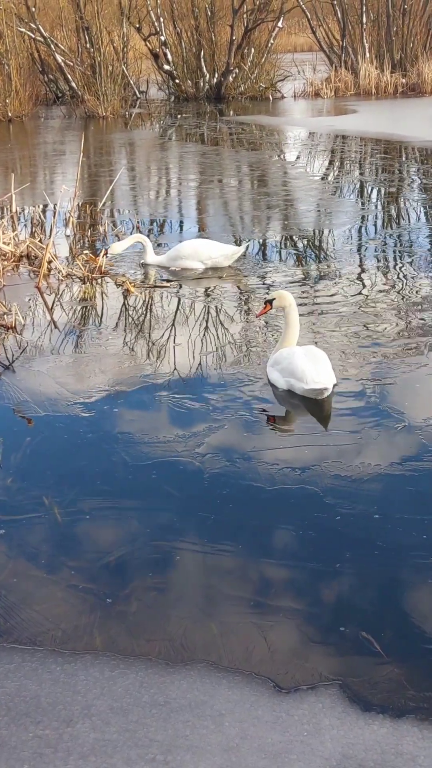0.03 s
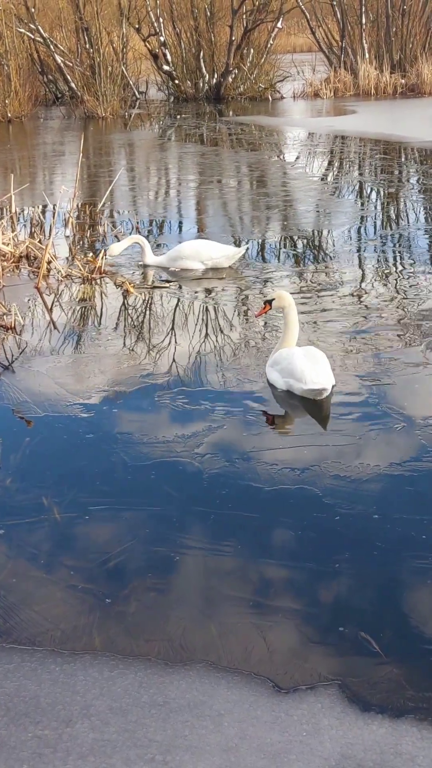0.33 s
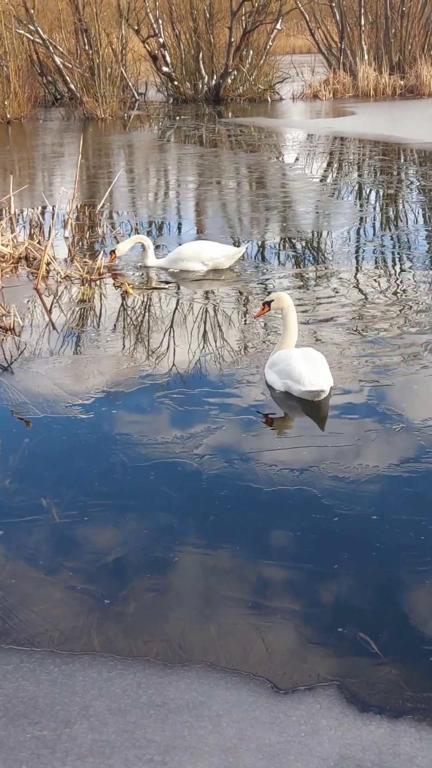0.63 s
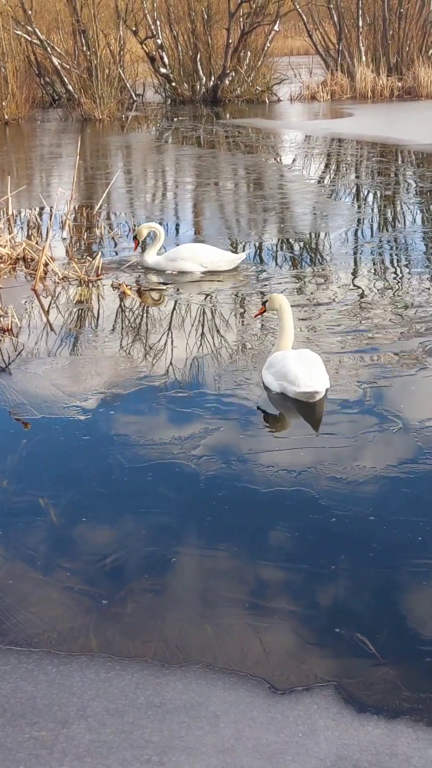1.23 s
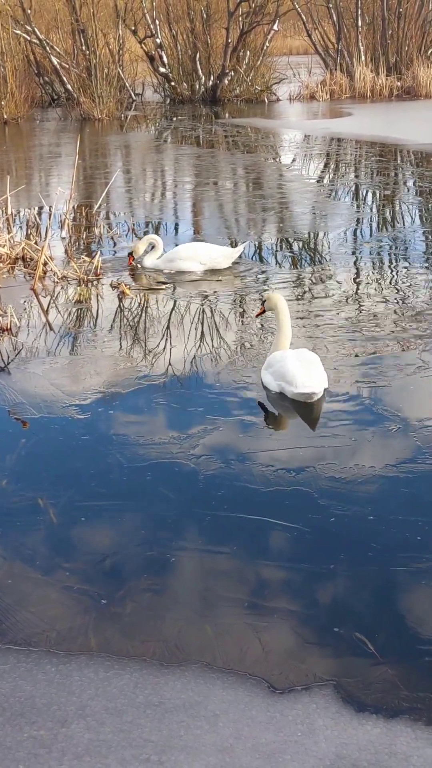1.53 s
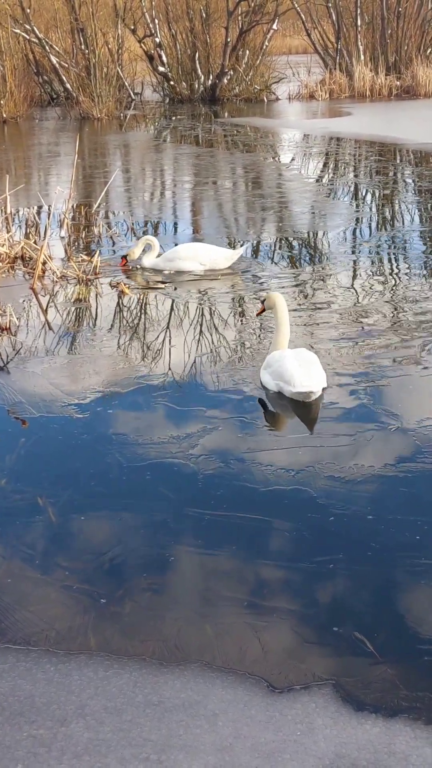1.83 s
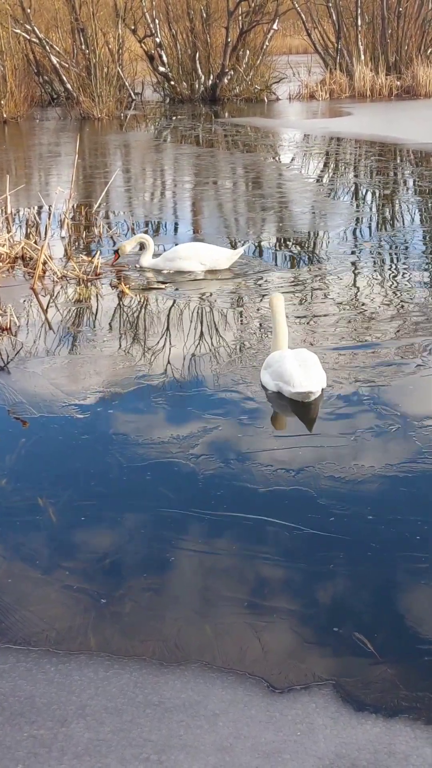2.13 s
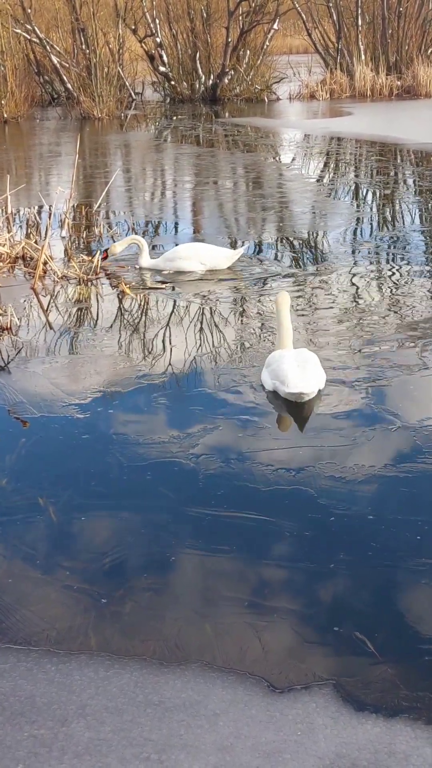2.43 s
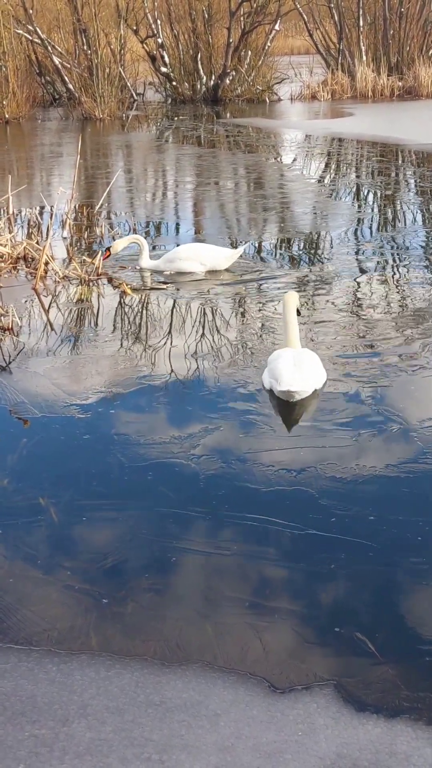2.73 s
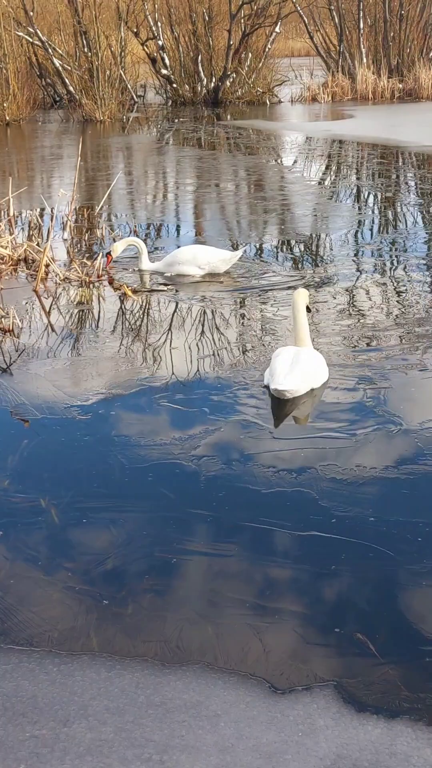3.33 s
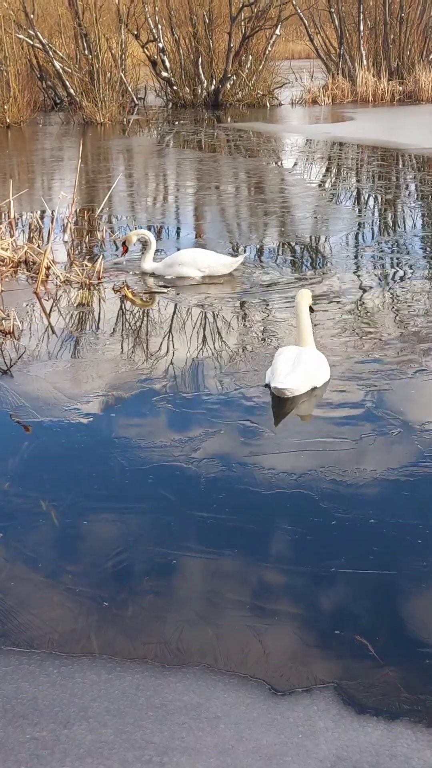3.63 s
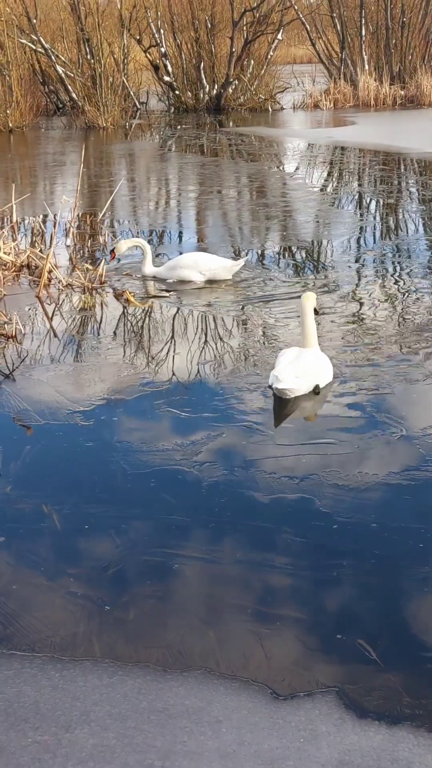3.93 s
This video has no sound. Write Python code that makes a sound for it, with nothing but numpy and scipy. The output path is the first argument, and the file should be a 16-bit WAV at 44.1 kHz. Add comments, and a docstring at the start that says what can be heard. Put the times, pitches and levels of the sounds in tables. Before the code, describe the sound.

Short, sharp waterbird calls, probably coots, echo over a pond as a swan dabbles quietly.

```python
"""A reedy pond, where two waterbirds, probably coots, trade short harsh calls.
One is bright and ringing, the other lower and more rattling; each call is a tone with overtones,
chopped by a fast flutter. A swan dabbles at the bank with sloshes, drips and ringing bubbles.
Birds and water echo off reeds and trees. Far engines rumble, and a little wind nudges the microphone."""
import sys
import numpy as np
from scipy import signal
from scipy.fft import rfft, irfft
from scipy.io import wavfile

SR = 44100
rng = np.random.default_rng(int(sys.argv[2]) if len(sys.argv) > 2 else 0)


def wav_out(sig):
    """Save sig, one row per channel (or a flat mono array), as 16-bit PCM at SR to the path in sys.argv[1]."""
    wavfile.write(sys.argv[1], SR, np.round(np.clip(np.atleast_2d(sig).T, -1, 1) * 32767).astype(np.int16))


N = 176400
TIME = np.arange(N) / SR
FREQS = np.maximum(np.arange(N + 1) * SR / (2 * N), 1)

# The bright bird's harmonics (1, 2, 3... times its pitch): level_db
BRIGHT_VOICE = [-15, -5.5, -12, -18, -24, -25.5, -31, -40, -34, -29, -36, -44]


def from_db(db):
    """Turn decibels into a number to multiply by."""
    return 10 ** (np.asarray(db) / 20)


def rms_one(x):
    """Scale a sound so its average strength (rms) is 1."""
    return x / np.sqrt(np.mean(x ** 2) + 1e-20)


def at_hz(points, hz=FREQS):
    """Read between the rows of a table, along a musical (log) frequency scale."""
    freqs, values = np.transpose(points)
    return np.interp(np.log(hz), np.log(freqs), values)


def filtered(x, response):
    """Multiply each frequency of a sound by its own gain."""
    return irfft(rfft(x, 2 * N) * response)[..., :N]


def colour(x, points):
    """Shape the tone by rows of freq_hz, gain_db; any ringing comes after a click, never before."""
    cepstrum = irfft(np.log(from_db(at_hz(points))))
    cepstrum[1:N] *= 2
    cepstrum[N + 1:] = 0
    return filtered(x, np.exp(rfft(cepstrum)))


def drift(hz):
    """A random wobble of size about 1, with little in it faster than hz."""
    return rms_one(filtered(rng.standard_normal(N), 1 / (1 + (FREQS / hz) ** 4)))


def place(x, lead_s):
    """Make a stereo sound that reaches the left side first."""
    return np.array([x, filtered(x, np.exp(-2j * np.pi * FREQS * lead_s))])


def lean(x, points):
    """Tip each frequency to the right (plus dB) or the left (minus dB)."""
    return filtered(x, from_db(at_hz(points) * np.array([[-.5], [.5]])))


def wide_noise(points, lead_s):
    """Stereo noise whose sides are alike in the bass and unrelated in the treble."""
    # How alike the sides are: freq_hz, share (0 to 1)
    likeness = [(30, 0.31), (70, 0.83), (150, 0.84), (500, 0.78), (1200, 0.83), (2500, 0.31), (5000, 0.067),
                (14000, 0.037)]
    alike = at_hz(likeness)
    shared = filtered(place(rng.standard_normal(N), lead_s), np.sqrt(alike))
    separate = filtered(rng.standard_normal((2, N)), np.sqrt(1 - alike))
    return rms_one(colour(shared + separate, points))


def engines():
    """Far traffic rumbles; a low background drone drifts slightly louder and softer."""
    # Tone of the rumble: freq_hz, gain_db
    rumble_tone = [(20, -19.5), (32, -24.5), (50, 3), (70, 1), (100, -7.5), (140, -8.5), (190, -13),
                   (270, -13.5), (380, -25.5), (550, -24), (800, -20), (1100, -24), (1500, -27),
                   (2100, -36.5), (3000, -46.5)]
    # Notes of the drone: pitch_hz, wobble_hz, level_db
    drone_notes = [(82.1, 13.6, -52.5), (112.5, 8.44, -51), (239.4, 7.3, -62.5), (509, 11.7, -78.5)]
    # The low background drone drifts slightly louder and softer: time_s, gain_db
    level_drift = [(0, -5), (.55, -1.5), (1.3, 1.5), (1.85, 2.5), (2.3, 0), (3.2, 2), (4, -7)]
    rumble = filtered(wide_noise(rumble_tone, lead_s=.00008), 1 / (1 + (FREQS / 3200) ** 6))
    rumble *= from_db(-49.5 + drift(7.7))   # flickers by about 1 dB
    drone = 0
    for hz, wobble_hz, db in drone_notes:
        pitch = hz + wobble_hz / 3 * drift(wobble_hz)
        drone += from_db(db) * np.sin(2 * np.pi * np.cumsum(pitch) / SR) * (1 + 0.35 * drift(wobble_hz))
    return rumble + drone * from_db(np.interp(TIME, *np.transpose(level_drift)))


def hiss():
    """A faint, steady hiss."""
    # Tone of the hiss: freq_hz, gain_db
    tone = [(2500, -16.5), (4000, -3.5), (7000, -8), (10000, -3), (13000, -2.5), (15500, 0)]
    return from_db(-76.5) * wide_noise(tone, lead_s=0)


def pond_echo(x):
    """Sound scatters quickly off the reeds and returns longer from the trees; treble dies first."""
    # Tone of the echo: freq_hz, gain_db
    tone = [(1000, 10.5), (1700, 15.5), (2500, 7.5), (3800, 9.5), (5200, 6), (7500, 15.5), (13000, 12)]
    reeds, trees = (-13.5, 0.164), (-17, 0.856)   # level_db, fade_s (time for the bass to drop 60 dB)
    t, tail = TIME[:SR], 0
    edges = np.geomspace(500, 17000, 9)
    for low, high in zip(edges, edges[1:]):
        hz = np.sqrt(low * high)
        band = signal.butter(2, [low, high], "band", fs=SR, output="sos")
        noise = signal.sosfilt(band, rng.standard_normal((2, SR))) * from_db(at_hz(tone, hz))
        air_loss = 1 + (hz / 13200) ** 2
        for db, fade_s in (reeds, trees):
            spread = np.sqrt(5.526 / (fade_s * SR))   # a longer echo spreads its energy thinner
            tail += noise * spread * from_db(db - 60 * air_loss * t / fade_s)
    fade_in = np.minimum(t / 0.002, 1)
    return signal.fftconvolve(x[None], tail * fade_in, axes=1)[:, :N]


def lingering_echo():
    """A bright call made just before the start still rings round the pond."""
    # That call: start_s, hold_s, pitch_hz, level_db, rattle (0 to 1), tilt_db_per_octave, rattle_hz
    call = (0, .036, 1262, -26, .15, -4, 105)
    echo = pond_echo(bird([call], BRIGHT_VOICE))
    gone = int(.17 * SR)
    return np.pad(echo[:, gone:], ((0, 0), (0, gone)))


def patter(tone, per_s=1600, spread_db=5):
    """Many tiny droplets of uneven size, each one a click."""
    sizes = from_db(spread_db * np.minimum(rng.exponential(1, N), 4)) * rng.choice([-1, 1], N)
    return rms_one(colour(sizes * (rng.random(N) < per_s / SR), tone))


def crackle(per_s=1000, spread_db=5, ring_cycles=7):
    """Tiny bubbles that each ring for a few cycles."""
    clicks = (rng.random(N) < per_s / SR) * from_db(spread_db * np.minimum(rng.exponential(1, N), 3))
    pitches_hz = np.geomspace(2200, 9000, 16)
    chosen, out = rng.integers(0, len(pitches_hz), N), 0
    for k, hz in enumerate(pitches_hz):
        decay, step = np.exp(-np.pi * hz / (ring_cycles * SR)), 2 * np.pi * hz / SR
        ringing = [1, -2 * decay * np.cos(step), decay ** 2]
        out += signal.lfilter([0, np.sin(step)], ringing, clicks * (chosen == k) + 1e-18)
    return rms_one(out)


def dabbling():
    """The feeding swan stirs the water: each slosh swells and dies away, with fine spray above it."""
    # Sloshes: peak_s, rise_s, fall_s, level_db, spray_db
    sloshes = [(0.123, 0.022, 0.1, -69, -69.5), (0.298, 0.015, 0.02, -59.5, -67),
               (.365, 0.053, 0.014, -61, -72), (.535, 0.063, .04, -54, -67),
               (0.654, 0.025, 0.024, -53, -63), (0.698, 0.02, 0.068, -53, -64.5),
               (.888, 0.047, 0.043, -59, -61), (0.949, 0.017, 0.022, -51, -59),
               (0.987, 0.0064, 0.013, -49, -63), (1.049, 0.06, 0.049, -55.5, -66.5),
               (1.163, 0.022, 0.016, -59, -60.5), (1.55, 0.01, 0.011, -55, -74),
               (1.58, .1, 0.15, -66.5, -73), (2.3, 0.21, 0.17, -99, -75.5), (2.555, 0.012, 0.083, -71, -71),
               (3.113, 0.009, 0.035, -62, -64), (3.222, 0.0051, 0.0052, -51, -61),
               (3.265, 0.007, 0.0084, -52, -56), (3.38, 0.093, 0.076, -57.5, -64),
               (3.479, 0.052, 0.011, -59.5, -52), (3.55, .005, 0.012, -70, -59)]
    # Tones of the slosh and the spray: freq_hz, gain_db
    slosh_tone = [(800, 27), (1500, 18), (2500, 3.5), (3800, 12), (5500, 19), (8000, -32.5), (11000, -44),
                  (16000, -32)]
    spray_tone = [(3000, -24.5), (8000, -2.5), (10500, -19.5), (12700, 11.5), (15000, 8.5), (16500, -12.5)]
    slosh_power, spray_power = 0, 0
    for peak, rise, fall, db, spray_db in sloshes:
        shape = np.exp(-np.maximum((peak - TIME) / rise, (TIME - peak) / fall))
        slosh_power += (shape * from_db(db)) ** 2
        spray_power += (shape * from_db(spray_db)) ** 2
    churn = from_db(-3.5) * patter(slosh_tone) + from_db(-3) * crackle()
    return np.sqrt(slosh_power) * churn + np.sqrt(spray_power) * patter(spray_tone)


def drops(scatter_db=-13, scatter_s=.0006):
    """Drops hit the water with a sharp tick and a brief scatter after it."""
    # Drops landing: start_s, body_db, snap_db
    hits = [(.115, -54, -43), (0.373, -36, -52), (.588, -59, -56), (.702, -45, -44), (.8625, -45, -23),
            (.8712, -33, -11), (.895, -42, -43), (1.149, -39, -37), (1.153, -39, -34), (1.774, -49, -46),
            (2.433, -60, -38), (2.540, -49.5, -42), (2.625, -57, -57), (2.852, -65, -38.5),
            (2.869, -62, -38), (3.11, -48, -26.5), (3.223, -47, -53), (3.304, -39, -28), (3.365, -46, -45),
            (3.474, -52, -36), (3.485, -40.5, -41), (3.574, -67, -38)]
    # Tones of a drop's body and its high snap: freq_hz, gain_db
    body_tone = [(1500, -38), (3500, 6.5), (6000, 16.5), (8500, -7.5), (11000, 0), (16000, -56)]
    snap_tone = [(3000, -30), (8000, -19), (10500, -13), (12700, 0), (15000, -1), (16500, -6)]
    body, snap, t = np.zeros(N), np.zeros(N), TIME[:SR // 100]
    for start, body_db, snap_db in hits:
        tick = (t == 0) + from_db(scatter_db) * rng.standard_normal(len(t)) * np.exp(-t / scatter_s)
        i = int(start * SR)
        body[i:i + len(t)] += from_db(body_db) * tick
        snap[i:i + len(t)] += from_db(snap_db) * tick
    return from_db(5) * colour(body, body_tone) + from_db(6) * colour(snap, snap_tone)


def bird(calls, voice_db):
    """Each call is a yelp that scoops up, then falls and dulls as it fades, chopped by a fast rattle."""
    edge_s, crest_s, release_s = 0.0013, .022, 0.01
    scoop, fall_per_s, rattle_bend = .07, 5.0, 0.086   # shares of the pitch
    swell_db, rattle_depth = 8, 0.58
    follows = [0.28, 1] + [1.42] * len(voice_db)   # higher harmonics follow the effort more strongly
    jitter = .006 * drift(750)   # roughens the pitch
    rasp = 1 + from_db(-28) * drift(750)   # roughens the loudness
    out = np.zeros(N)
    for start, hold, hz, db, rattle, tilt_db, rattle_hz in calls:
        on = (TIME >= start) & (TIME < start + 2 * hold)
        t = TIME[on] - start
        rising, falling = np.maximum(1 - t / crest_s, 0) ** 2, np.maximum(t - crest_s, 0)
        beat = 2 * np.pi * rattle_hz * t * (1 + 0.04 * rng.standard_normal())
        bend = rattle_bend * rattle * (np.sin(beat) + np.sin(2 * beat) / 2)   # beats start high and sag
        pitch = hz * (1 - scoop * rising - fall_per_s * falling + bend + jitter[on])
        phase = 2 * np.pi * np.cumsum(pitch) / SR
        effort = from_db(-swell_db * rising) * np.exp(-np.maximum(t - hold, 0) / release_s)
        tone = 0
        for k, harmonic_db in enumerate(voice_db, 1):
            strength = from_db(harmonic_db + tilt_db * np.log2(max(k, 2) / 2))
            tone += strength * effort ** follows[k - 1] * np.sin(k * phase + rng.uniform(0, 2 * np.pi))
        soft_edges = np.clip(np.minimum(t, 2 * hold - t) / edge_s, 0, 1)
        chop = 1 - rattle_depth * rattle * np.cos(beat)
        out[on] += from_db(db) * tone * soft_edges * chop * rasp[on]
    return out


def bright_bird():
    """The first bird gives higher, ringing calls with little rattle."""
    # Calls: start_s, hold_s, pitch_hz, level_db, rattle (0 to 1), tilt_db_per_octave, rattle_hz
    calls = [(.446, 0.03, 1286, -33, 0.28, 0.5, 108), (1.625, 0.031, 1281, -29.5, 0.11, 0.5, 103),
             (2.747, 0.037, 1259, -33, 0.54, 1, 115.4), (3.880, 0.031, 1233, -30.5, 0.41, 1.5, 106.4)]
    return bird(calls, BRIGHT_VOICE)


def wind(alike=0.41):
    """Puffs of swirling air thump softly on the microphone, partly alike on both sides."""
    # Puffs: peak_s, width_s, level_db
    gusts = [(0.524, 0.023, -36), (1.027, .06, -42), (2.616, 0.041, -35.5), (2.865, 0.032, -37),
             (2.996, 0.02, -43)]
    # Tone of the wind: freq_hz, gain_db
    tone = [(25, -20), (55, 8.5), (100, 6), (200, -9), (400, -31), (900, -29)]
    puffs = sum(from_db(db) * np.exp(-((TIME - peak) / width) ** 2) for peak, width, db in gusts)
    swirls = np.sqrt(alike) * rng.standard_normal(N) + np.sqrt(1 - alike) * rng.standard_normal((2, N))
    return puffs * rms_one(filtered(colour(swirls, tone), 1 / (1 + (FREQS / 700) ** 4)))


def bubbles(decay_s=0.0025, rise_per_s=7):
    """Single bubbles ring with a small plip that rises in pitch as it dies."""
    # Bubbles: start_s, pitch_hz, level_db
    plips = [(0.689, 1520, -47.5), (.702, 3450, -38), (0.807, 1110, -45), (0.98, 1340, -44),
             (0.979, 3060, -42), (1.098, 1460, -41), (1.109, 1820, -57), (1.152, 1650, -49),
             (3.107, 2640, -48.5), (3.222, 2650, -51), (3.263, 2570, -53)]
    out, t = np.zeros(N), TIME[:SR // 20]
    for start, hz, db in plips:
        i = int(start * SR)
        phase = 2 * np.pi * hz * t * (1 + rise_per_s * t / 2)
        out[i:i + len(t)] += from_db(db) * np.exp(-t / decay_s) * np.sin(phase)
    return out


def low_bird():
    """The second bird answers lower and more quietly, with a strong rattle."""
    # Calls: start_s, hold_s, pitch_hz, level_db, rattle (0 to 1), tilt_db_per_octave, rattle_hz
    calls = [(1.010, 0.022, 1186, -41, 0.86, -1.3, 88.6), (2.153, 0.03, 1140, -46, 0.87, -1.4, 86),
             (2.438, 0.029, 1100, -50, 0.79, -2.4, 91.7), (3.282, 0.028, 1104, -40, 0.74, 0.48, 97.3),
             (3.582, 0.018, 1001, -55, 1, -0.44, 95)]
    # Its harmonics, lowest first: level_db
    voice = [-9.5, 0, -13.5, -11, -25, -20, -23, -27, -36, -32, -28, -45]
    return bird(calls, voice)


def scene():
    """Birds and water with their echoes, over engines, wind and hiss."""
    # Left-right balance of the direct sounds and of the background: freq_hz, right_louder_db
    direct_balance = [(30, -16), (120, -6), (260, -6), (600, -11), (1250, 7), (1800, -3), (2400, 15.5),
                      (2700, 7.5), (3300, -4), (5000, 5.5), (8500, -7.5), (10500, 8.5), (13000, 10),
                      (16000, 9)]
    background_balance = [(30, -4), (70, 0.5), (130, 0.5), (260, 0.5), (600, 0.1), (1250, -2.5), (8500, 0),
                          (13000, 6)]
    bright, low = bright_bird(), low_bird()
    water = dabbling() + drops() + bubbles()
    direct = place(bright, lead_s=.0001254) + place(low, lead_s=.000112) + place(water, lead_s=.0001)
    echo = pond_echo(bright + from_db(0.5) * low + from_db(-3) * water) + lingering_echo()
    background = engines() + wind() + hiss()
    return lean(direct, direct_balance) + echo + lean(background, background_balance)


def record(dry):
    """Cut the very highest treble steeply."""
    cutoff_hz = 16100
    return signal.sosfilt(signal.ellip(12, .1, 80, cutoff_hz, fs=SR, output="sos"), dry)


dry = scene()
out = record(dry)
wav_out(out)
```